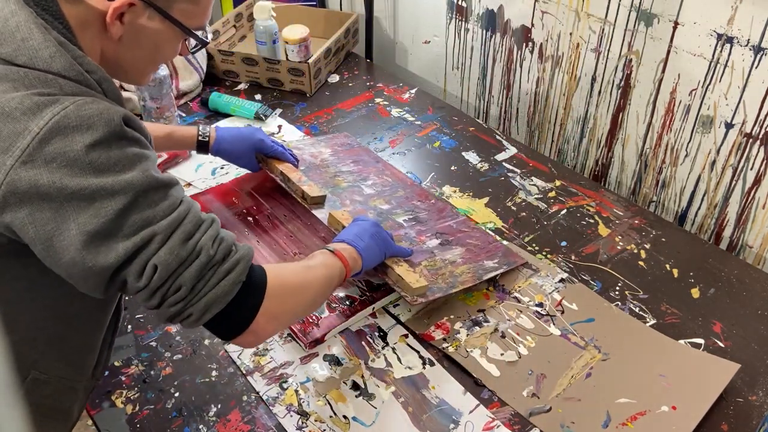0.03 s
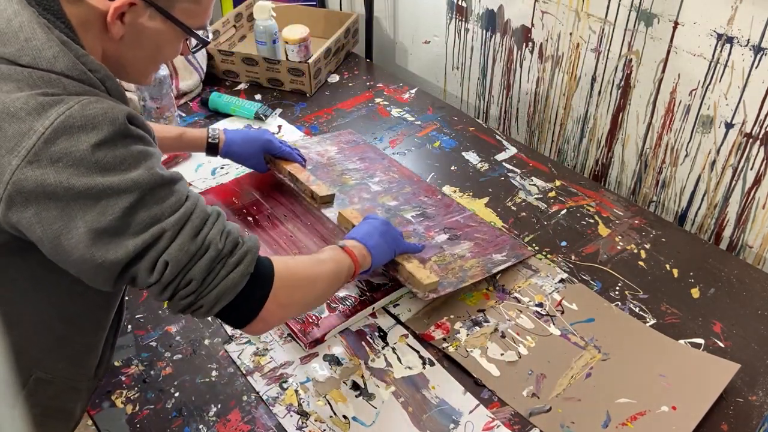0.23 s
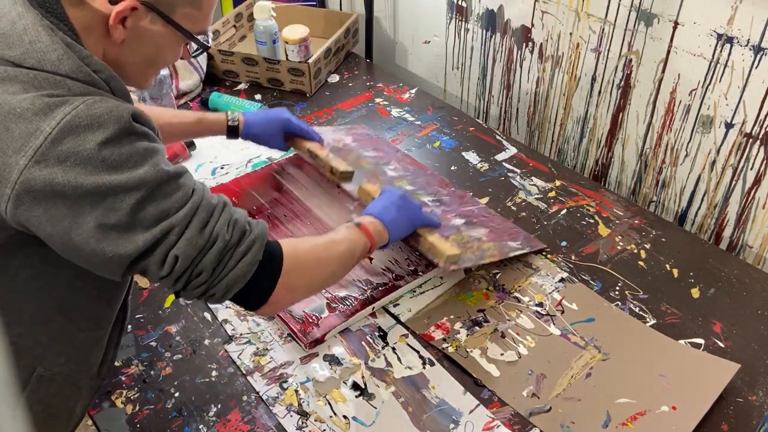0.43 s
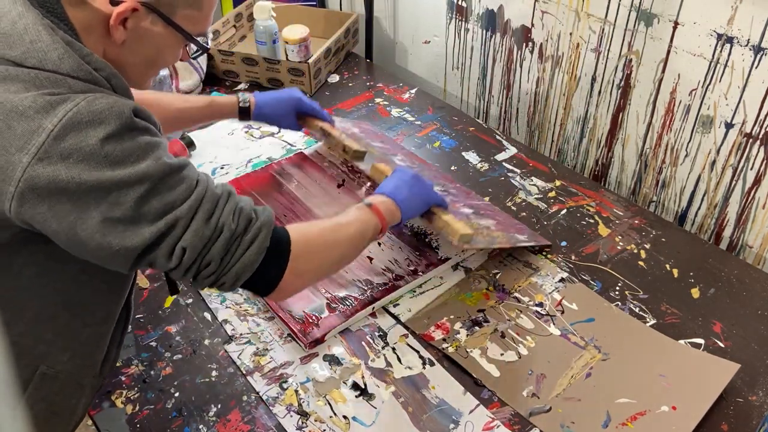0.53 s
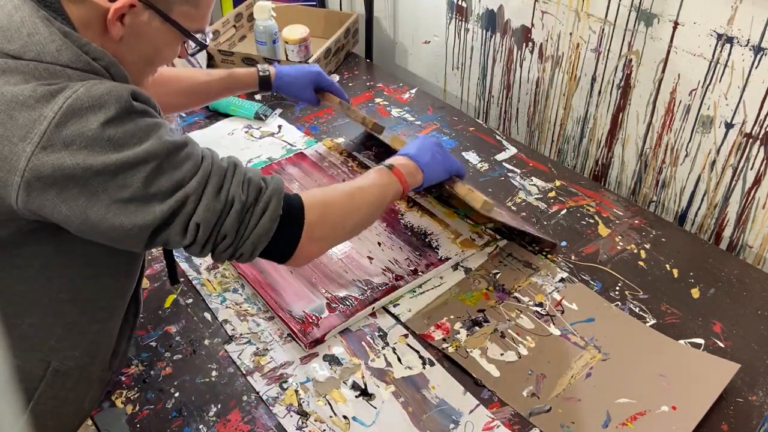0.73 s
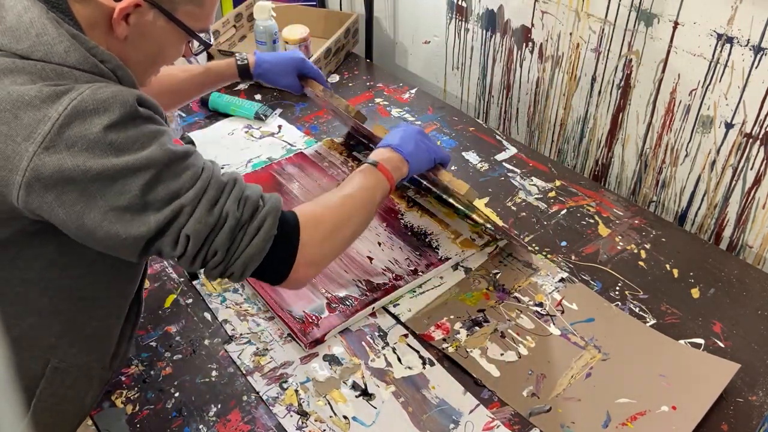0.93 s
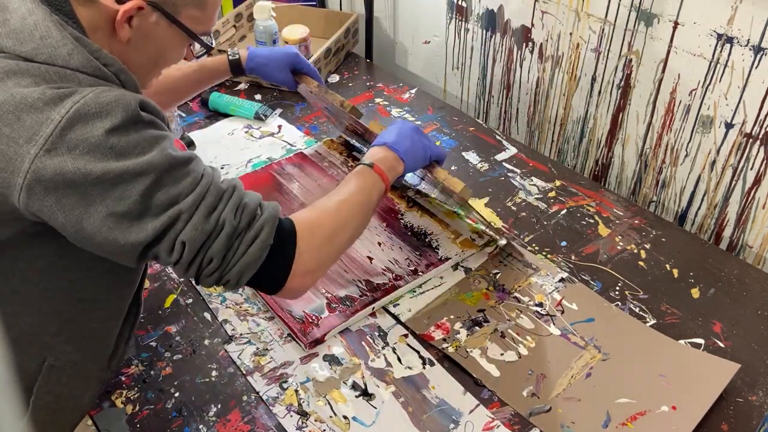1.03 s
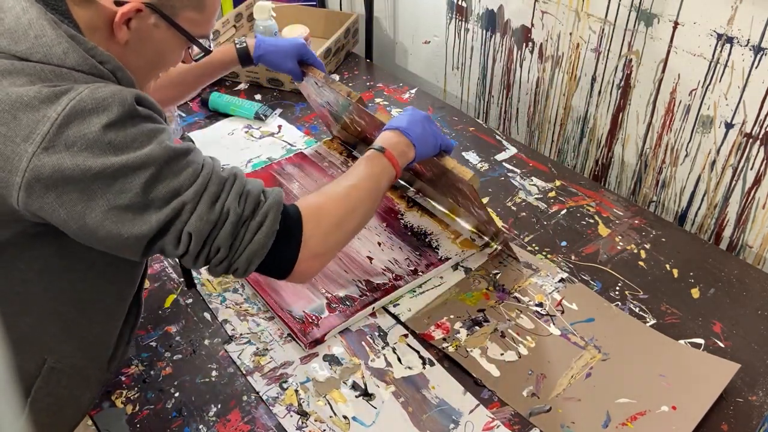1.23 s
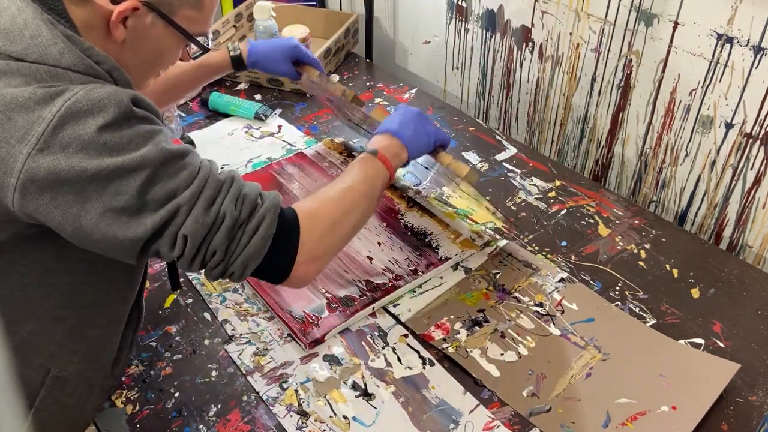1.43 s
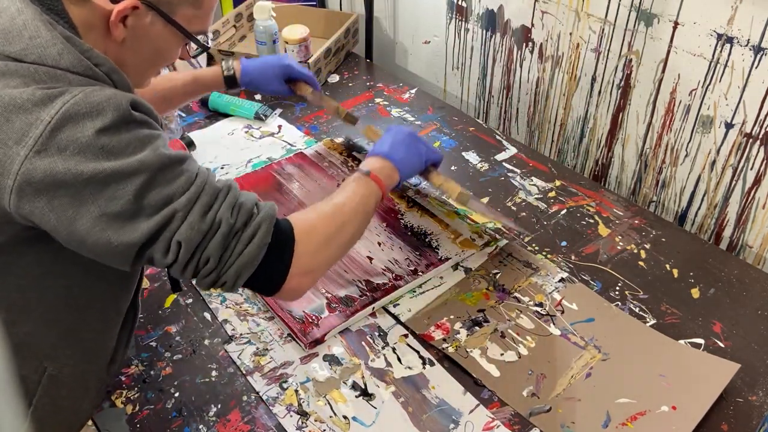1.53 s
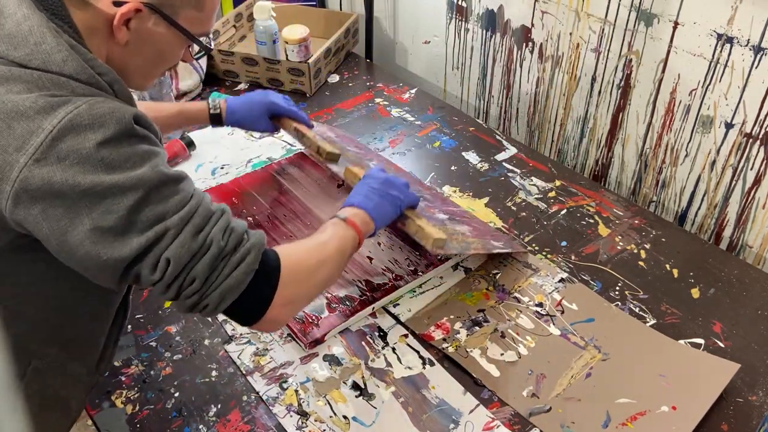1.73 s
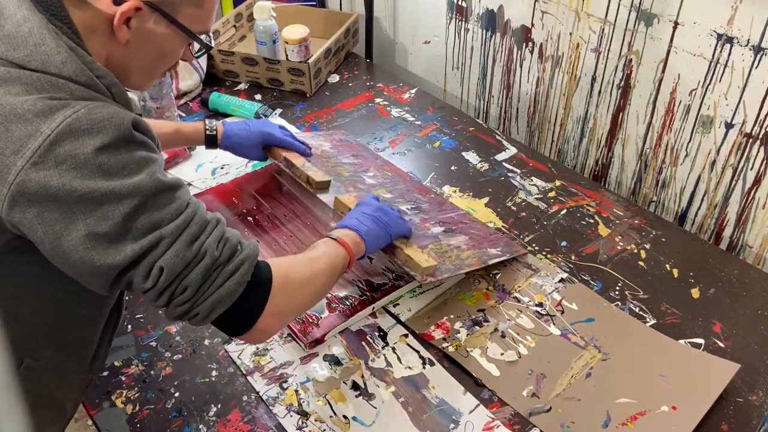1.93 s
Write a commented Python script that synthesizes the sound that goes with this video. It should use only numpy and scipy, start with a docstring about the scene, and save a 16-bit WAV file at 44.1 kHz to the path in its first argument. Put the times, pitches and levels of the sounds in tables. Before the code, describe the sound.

A wide scraper rasps across wet paint on a canvas, slides off the edge and clacks sharply. It is set down again with a hollow, rattling wooden knock, heard nearby over the low rumble of a small studio.

```python
"""Over the low rumble of a small, lively studio, a wide scraper with a wooden handle is dragged over
wet paint on a canvas that lies on a table. Stick-slip friction rings scraper and canvas, while the
paint hisses and snaps. The blade slides off the edge and, hanging free, rings higher. It clacks,
is lifted, and is set down again with a hollow, rattling knock as the next stroke begins."""
import sys
import numpy as np
from scipy import signal
from scipy.fft import rfft, irfft
from scipy.io import wavfile
from scipy.ndimage import uniform_filter1d

SR = 44100
rng = np.random.default_rng(int(sys.argv[2]) if len(sys.argv) > 2 else 0)


def output_pcm(signal):
    """Save a mono or channel-first signal as 16-bit PCM at the path in sys.argv[1].

    Samples are clipped to [-1, 1] before scaling.
    """
    pcm = np.clip(np.atleast_2d(signal).T, -1, 1) * 32767
    wavfile.write(sys.argv[1], SR, np.round(pcm).astype(np.int16))


N = 88200
FFT_SIZE = 110592
FREQS, TIME = np.maximum(np.fft.rfftfreq(FFT_SIZE, 1 / SR), 1), np.arange(N) / SR


def undb(db):
    """Decibels to amplitude ratio."""
    return 10 ** (np.asarray(db) / 20)

def unit(x):
    """Normalisation to an rms of one."""
    return x / np.sqrt(np.mean(abs(x) ** 2))

def along(points):
    """Interpolation of (frequency [Hz], value) points on a log-frequency axis."""
    hz, value = np.array(points, float).T
    return np.interp(np.log(FREQS), np.log(hz), value)

def causal(gain):
    """Minimum phase: a response with these gains that never precedes its cause."""
    cepstrum = irfft(np.log(gain))
    cepstrum[1:FFT_SIZE // 2] *= 2
    cepstrum[FFT_SIZE // 2 + 1:] = 0
    return np.exp(rfft(cepstrum))

def colour(points):
    """Causal filter through (frequency [Hz], level [dB]) points."""
    return causal(undb(along(points)))

def resonance(hz, width_hz):
    """Response of a damped oscillator, gain one at its centre."""
    return 1 / (1 + 1j * (FREQS ** 2 - hz ** 2) / (FREQS * width_hz))

def modes(table):
    """Modal superposition: a body's resonances over a dense, even ring."""
    return 1 + sum(undb(db) * resonance(hz, width) for hz, width, db in table)

def ring(force, response):
    """Forced vibration: a force filtered by a response of unit rms gain."""
    return irfft(rfft(force, FFT_SIZE) * unit(response))[:N]

def rumble(width=0.14):
    """Partly coherent noise: a low background, nearly alike left and right, that swells and sinks."""
    # background spectrum (frequency [Hz], relative level [dB])
    spectrum = [(15, -68), (26, -13), (35, -15), (48, -4), (70, -1.5), (100, -13.5), (150, -13), (250, -33),
                (500, -36.5), (1000, -45), (2500, -53.5), (8000, -62), (15000, -62.5)]
    # background envelope (time [s], level [dB])
    swell = [(0, -50.5), (.22, -53), (.4, -55.5), (.85, -50.5), (1.2, -48.5), (1.42, -55), (1.56, -51),
             (1.67, -48.5), (2.0, -47.5)]
    mid, side = (ring(rng.standard_normal(N), colour(spectrum)) for _ in range(2))
    level = undb(np.interp(TIME, *np.array(swell).T))
    return level * (mid + width * side * np.array([[1], [-1]]))

def grip(per_s=110, depth_db=1.5):
    """Amplitude modulation: the blade's grip wavers at random."""
    waver = unit(np.interp(TIME * per_s, np.arange(N), rng.standard_normal(N)))
    return unit(undb(depth_db * waver))

def slips(per_s, scatter_db):
    """Poisson process: tiny slips at random moments with random strength."""
    happens = rng.random(N) < per_s / SR
    sign = rng.choice([-1, 1], N)
    strength = undb(scatter_db * np.clip(rng.standard_normal(N), -2, 2))
    return unit(happens * sign * strength)

def scraping(strokes, body, fade_s=0.016):
    """Stick-slip friction: catches shake canvas and scraper; grains of weave and paint add grit, hiss."""
    # spectra of the five parts of the friction (frequency [Hz], relative level [dB])
    boom_tone = [(22, -40.5), (40, -26), (65, 5.5), (100, -14), (130, -9), (185, 0), (280, -2.5), (340, -3),
                 (600, -50.5), (2000, -62.5)]
    judder_tone = [(150, -25), (260, -7), (320, -8.5), (520, 3.5), (680, -2), (1000, -9.5), (2500, -54.5)]
    rasp_tone = [(250, -51), (500, -6), (680, 10.5), (1050, 5.5), (1400, 4.5), (1800, -10.5), (3500, -39),
                 (9000, -54.5)]
    grit_tone = [(700, -26.5), (1400, 0.5), (2000, 3.5), (3300, -0.5), (4500, -9), (6000, -17),
                 (12000, -56)]
    hiss_tone = [(2500, -11), (5000, 0), (7200, 2), (8500, -0.5), (9200, -7), (10500, -2.5), (12500, -10.5),
                 (15500, -11)]
    levels = np.zeros((5, N))
    for stroke in strokes:
        times, *columns = np.array(stroke).T
        touching = np.clip(1 + np.minimum(TIME - times[0], times[-1] - TIME) / fade_s, 0, 1)
        levels = np.maximum(levels, [touching * undb(np.interp(TIME, times, db)) for db in columns])
    boom, judder, rasp, grit, hiss = levels * grip()
    catches = sum(ring(level * slips(per_s=1600, scatter_db=2), body * colour(tone))
                  for level, tone in ((boom, boom_tone), (judder, judder_tone), (rasp, rasp_tone)))
    grains = sum(ring(level * slips(per_s=4700, scatter_db=-2), response)
                 for level, response in ((grit, body * colour(grit_tone)), (hiss, colour(hiss_tone))))
    return catches + grains

def contact(start, decay_s, rise_share=0.12):
    """Contact noise: micro-impacts swell quickly and decay exponentially; energy one."""
    age = np.maximum(TIME - start, 0)
    rise = 1 - np.exp(-age / (rise_share * decay_s))
    burst = rng.standard_normal(N) * rise * np.exp(-age / decay_s)
    return burst / np.sqrt(np.sum(burst ** 2))

def struck(table, start, push_s=0.001):
    """Free vibration: damped modes ring on after one push; energy one."""
    age = np.maximum(TIME - start, 0)
    tone = sum(undb(db) * np.sin(2 * np.pi * hz * age) * np.exp(-np.log(1000) * age / t60)
               for hz, db, t60 in table)
    tone *= 1 - np.exp(-age / push_s)
    return tone / np.sqrt(np.sum(tone ** 2))

def knocks(scraper, canvas):
    """Impact excitation: wood clacks, handle and frame ring on, the edge cracks, the table thuds."""
    # blows of the scraper (time [s], wood level [dB], wood centre [Hz], handle level [dB],
    # frame level [dB], crack level [dB], thud level [dB], chatter decay [s])
    blows = [(0.076, -27, 520, -41, -49, -34, -22, 0.004), (0.092, -22.5, 516, -47, -40, -22, -18, 0.024),
             (0.125, -23, 480, -19, -33.5, -21.5, -27.5, 0.019),
             (0.293, -14, 840, -22, -33, -40, -29, 0.00092), (0.403, -9, 560, -6, -23, -9, -21, 0.011),
             (0.787, -14, 825, -33, -38.5, -17, -31, 0.0052), (0.956, -12, 590, -45, -27, -7.5, -35, 0.013),
             (0.963, 5, 682, -4.5, 0.5, -1, -25.5, 0.01), (0.979, -2, 683, -12.5, -27, -1.5, -9.5, 0.0064),
             (1.003, -8, 470, -31, -7.5, -24, -3.5, 0.01), (1.019, -8.5, 500, -8, -36, -33, -10, 0.0023),
             (1.044, -18, 447, -25, -12.5, -39.5, -13.5, 0.0021),
             (1.061, -10, 750, -40, -20, -14, -18.5, 0.0051),
             (1.096, -10, 520, -19, -22.5, -13.5, -9.5, 0.01),
             (1.12, -11.5, 600, -31, -20, -20, -19.5, 0.0056),
             (1.168, -15.5, 474, -33, -15.5, -25.5, -8.5, 0.017),
             (1.681, -4.5, 783, -21, -18, -6.5, -12, 0.011), (1.696, 1, 450, -15, -4, -1.5, -14, 0.014),
             (1.715, -10, 472, 2.5, -25, -13.5, -1.5, 0.013),
             (1.75, -11.5, 500, -11.5, -10.5, -14.5, -13.5, 0.0041),
             (1.77, -7, 560, -15, -26, -20, -17, 0.0042),
             (1.806, -7.5, 598, -9.5, -14.5, -15.5, -17.5, 0.0051),
             (1.822, -11.5, 427, -35, -6, -26, -9, 0.0086)]
    # impact spectra, the wood centred on 500 Hz (frequency [Hz], relative level [dB])
    wood_tone = [(100, -29.5), (210, -1), (300, -0.5), (450, 1), (620, -1.5), (780, 0), (1200, 1.5),
                 (1800, -20.5), (4000, -43.5), (12000, -62.5)]
    crack_tone = [(400, -22), (1200, 5), (2200, 8), (3500, 0.5), (5500, -8), (8000, -11.5), (10000, -21.5),
                  (15500, -29.5)]
    thud_tone = [(22, -42), (40, 6), (65, 1.5), (95, 1.5), (130, 1), (230, -4), (350, -10), (800, -12.5),
                 (3000, -66.5)]
    # modes of wooden handle and canvas frame (frequency [Hz], relative level [dB], t60 [s])
    handle = [(495, -13, 0.31), (560, -1, 0.19), (619, -5, .18), (658.5, -2.5, 0.23), (757.6, 0.5, 0.11),
              (1010, -16, 0.18)]
    frame = [(305, -5.5, 0.11), (337.8, -3, 0.12), (401, -1.5, 0.15)]
    wood, crack, thud = np.zeros((3, N))
    plank = colour(wood_tone)
    for start, wood_db, wood_hz, handle_db, frame_db, crack_db, thud_db, chatter_s in blows:
        blow = contact(start, chatter_s)
        # each clack has its own pitch, depending on where the scraper strikes
        clack = np.interp(FREQS * 500 / wood_hz, FREQS, plank)
        wood += undb(wood_db) * ring(blow, scraper * clack)
        wood += undb(handle_db) * struck(handle, start) + undb(frame_db) * struck(frame, start)
        crack += undb(crack_db) * blow
        thud += undb(thud_db) * contact(start, 2 * chatter_s)
    return wood + ring(crack, scraper * colour(crack_tone)) + ring(thud, canvas * colour(thud_tone))

def snaps(decay_s=0.0045, width_share=0.71):
    """Adhesion: sticky paint snaps against the blade in short, bright ticks."""
    # snaps of wet paint (time [s], level [dB], centre [Hz])
    ticks = [(0.64, -20, 11800), (0.691, -22, 6360), (1.165, -34, 5600), (1.321, -35.5, 3000),
             (1.704, -17, 9700)]
    return sum(undb(db) * ring(contact(start, decay_s), resonance(hz, width_share * hz) ** 2)
               for start, db, hz in ticks)

def echoes(first_s=0.0024, early_db=0.5, tail_db=-9):
    """Reverberation: early reflections from table and wall, then a tail that is longest in the bass."""
    # reverberation time of the studio (frequency [Hz], t60 [s])
    bands = [(100, 2.25), (300, .5), (800, 0.39), (2000, 0.54), (5000, 0.34), (14000, 0.74)]
    age = np.maximum(TIME - first_s, 0)
    noise, tail = rfft(rng.standard_normal(N), FFT_SIZE), 0
    for centre, t60 in bands:
        share = along([(hz, hz == centre) for hz, _ in bands])
        decay = (age > 0) * np.exp(-np.log(1000) * age / t60)
        decay /= np.sqrt(np.sum(decay ** 2))
        tail += rfft(irfft(noise * share)[:N] * decay, FFT_SIZE)
    early = rfft(contact(first_s, decay_s=0.0057), FFT_SIZE)
    return undb(tail_db) * tail + undb(early_db) * early

def even(response, band_hz=50):
    """Spectral whitening: a response levelled over bands echoes without colouring."""
    power = uniform_filter1d(abs(response) ** 2, size=int(band_hz * FFT_SIZE / SR))
    return response / causal(np.sqrt(power))

def studio(sound, left_lag_s=0.000015):
    """Multipath propagation: direct sound and echoes reach left and right from one spot on the table."""
    # width of the reflected sound (frequency [Hz], side over mid [dB])
    width = [(80, -28), (220, -12.5), (400, -10), (560, 0), (1100, -6), (1700, 2), (3000, -8.5),
             (5000, -0.5), (9000, -34), (14000, -31.5)]
    # stereo balance (frequency [Hz], left minus right [dB])
    balance = [(60, 3), (110, -4), (200, 1.5), (380, 1), (700, -4), (1290, 0), (2380, -1), (4400, -5),
               (8120, 0), (15000, 0.0)]
    sides = np.array([[1], [-1]])
    lag = np.exp(-1j * np.pi * FREQS * left_lag_s * sides)
    mid = even(1 + echoes())
    side = even(echoes()) * undb(along(width))
    paths = lag * (mid + sides * side) * undb(sides * along(balance) / 2)
    return irfft(rfft(sound, FFT_SIZE) * paths)[:, :N]

def scene():
    """Superposition of friction, impacts and rumble; the blade's support sets the scraper's modes."""
    # friction of the strokes (time [s], canvas boom [dB], judder [dB], rasp [dB], grit [dB], hiss [dB])
    drag = [(0.0,-59.5,-56,-70.5,-62.5,-70),(0.049,-67,-75,-64,-67,-72),(0.135,-75,-43.5,-56,-51.5,-59.5),(0.202,-70,-60,-63,-58.5,-63.5),(0.274,-75,-74,-64.5,-56.5,-61.5),(0.301,-54.5,-45.5,-42,-52.5,-59),(0.33,-37,-32.5,-33,-39,-47),(0.354,-43,-44,-31.5,-38,-47.5),(0.385,-36,-33.5,-22,-34.5,-46.5),(0.406,-26.5,-32.5,-26,-41,-50.5),(0.422,-43.5,-36.5,-38,-44.5,-51),(0.47,-40,-37,-38.5,-47.5,-56.5),(0.522,-44.5,-42,-47.5,-53,-58.5),(0.574,-48.5,-34.5,-42,-45.5,-51.5),(0.62,-41,-37,-41.5,-48.5,-53),(0.662,-40.5,-39.5,-47,-47,-53),(0.719,-40,-49.5,-55.5,-57.5,-67),(0.745,-57,-44.5,-73.5,-63,-59)]
    slide_off = [(0.755,-46.5,-51,-51.5,-50,-52),(0.79,-51,-43.5,-49,-48.5,-47),(0.83,-52,-48.5,-43,-41.5,-44.5),(0.856,-57,-34.5,-41.5,-45.5,-44.5),(0.88,-53,-38.5,-36.5,-47,-51.5),(0.897,-63.5,-41.5,-39,-36,-45),(0.912,-56.5,-32.5,-37.5,-51,-57.5),(0.93,-44.5,-33,-39,-40.5,-59),(0.951,-47,-43,-36.5,-61.5,-47.5)]
    lift = [(1.02,-55.5,-51.5,-57,-74,-73.5),(1.109,-45,-46,-47.5,-57,-68.5),(1.199,-55,-54,-66,-62,-69),(1.27,-67.5,-66,-68.5,-87.5,-105),(1.33,-71,-71,-79.5,-94,-101)]  # the edge rubs on as it is lifted
    next_drag = [(1.831,-51,-42.5,-45,-63,-71),(1.928,-60.5,-73.5,-85,-68,-66.5),(1.973,-68,-70,-66,-62,-55),(2.0,-73,-58.5,-43,-58,-54)]
    # modes of the scraper pressed flat on the canvas, and hanging free over the edge
    # (frequency [Hz], bandwidth [Hz], level over the dense ring [dB])
    pressed_modes = [(132.5, 21, 5), (205, 21.5, -1.5), (272, 44, -0.5), (307, 31, 4), (396.5, 47, 4.5),
                     (562, 17, -0.5), (668, 14, 2.5), (858, 52, -0.5), (1007, 29, 5), (1102, 49, 3.5),
                     (1355, 82, -9.5), (2042, 35, -7.5), (2890, 60, -18.5)]
    free_modes = [(318.5, 20, 7.5), (500, 34, 5.5), (757, 35, 2.5), (1053, 17, 10.5), (1397, 96, 2),
                  (1770, 16, -16.5), (2270, 94, -21), (2720, 22, -4.5), (3416, 55, 1), (4610, 130, -5.5)]
    pressed, free = modes(pressed_modes), modes(free_modes)
    friction = scraping((drag, next_drag), pressed) + scraping((slide_off, lift), free)
    return studio(friction) + studio(knocks(scraper=free, canvas=pressed) + snaps()) + rumble()

def record(dry):
    """Band limiting: a steep low-pass removes the highest treble."""
    return signal.sosfilt(signal.ellip(10, .2, 80, 15900, fs=SR, output="sos"), dry)


dry = scene()
out = record(dry)
output_pcm(out)
```